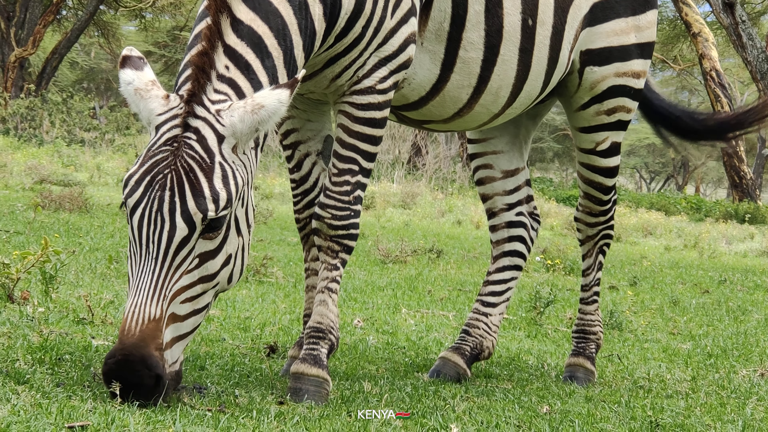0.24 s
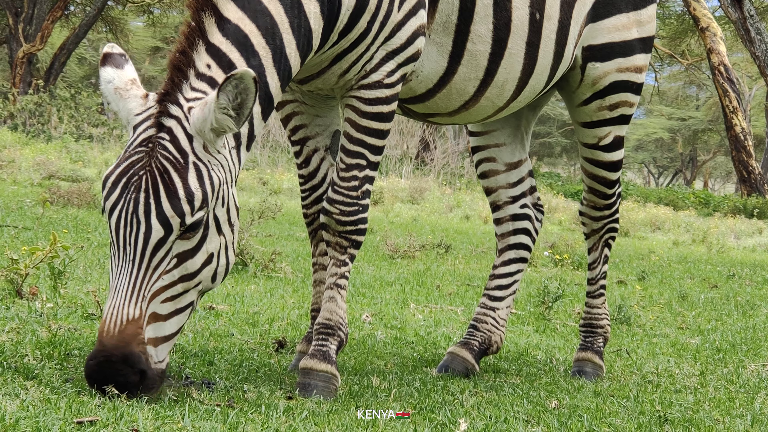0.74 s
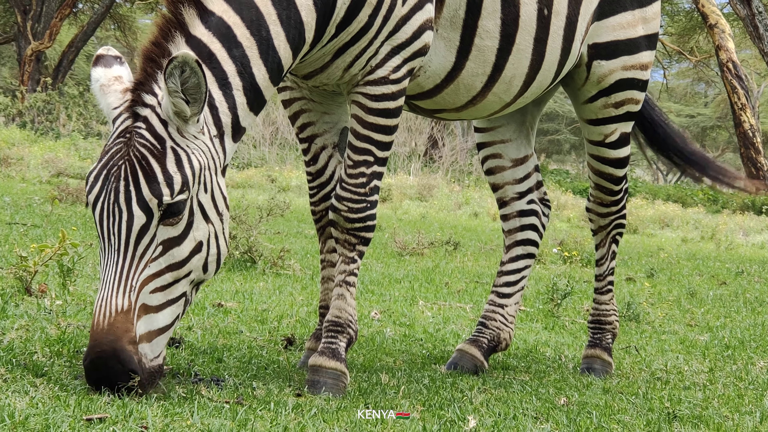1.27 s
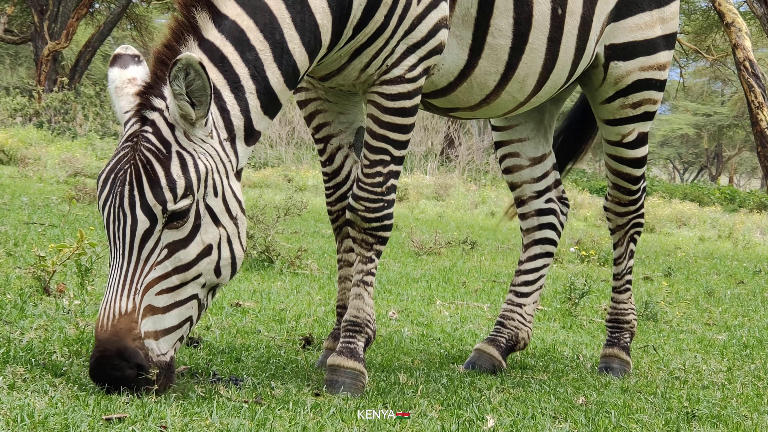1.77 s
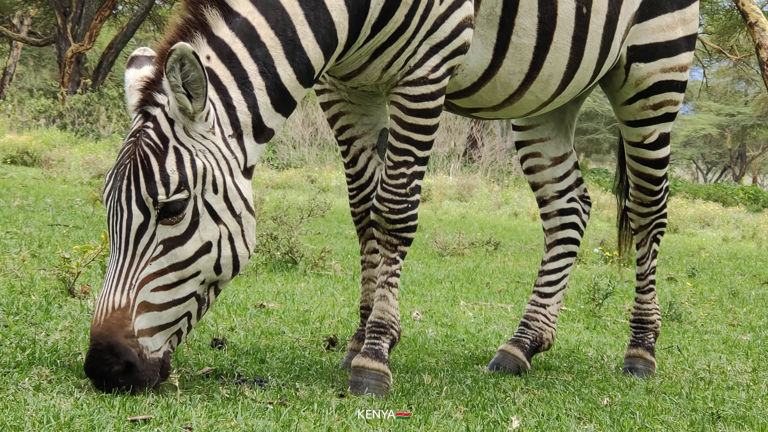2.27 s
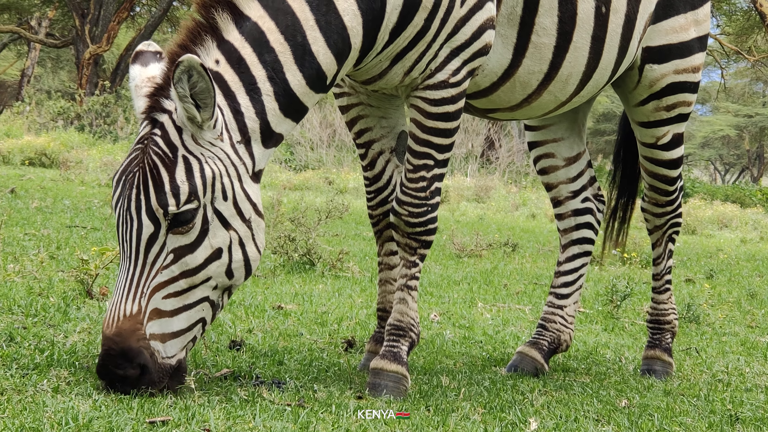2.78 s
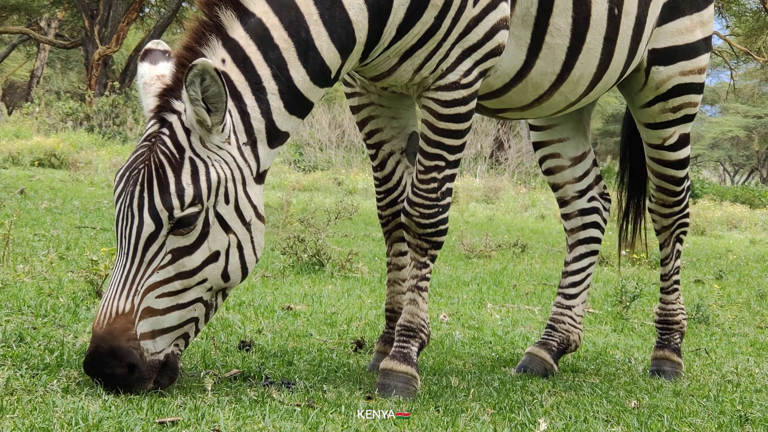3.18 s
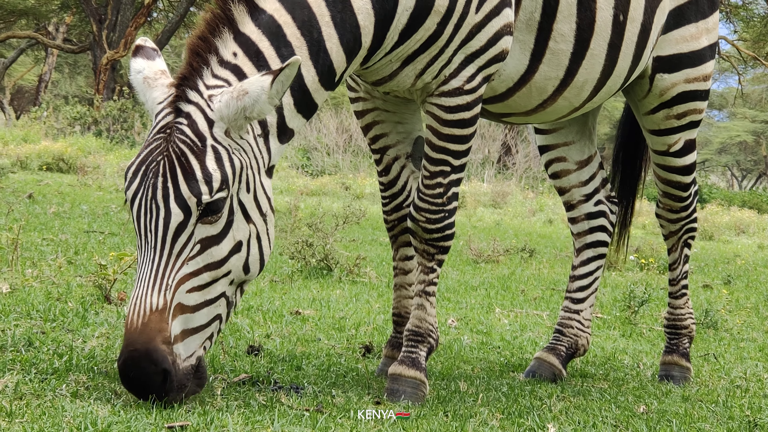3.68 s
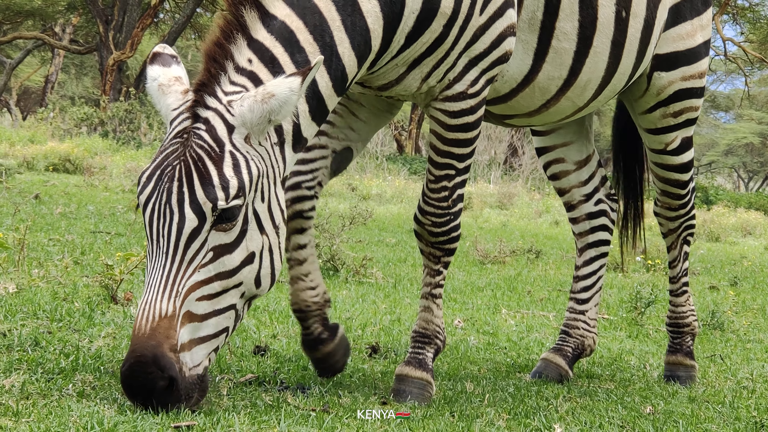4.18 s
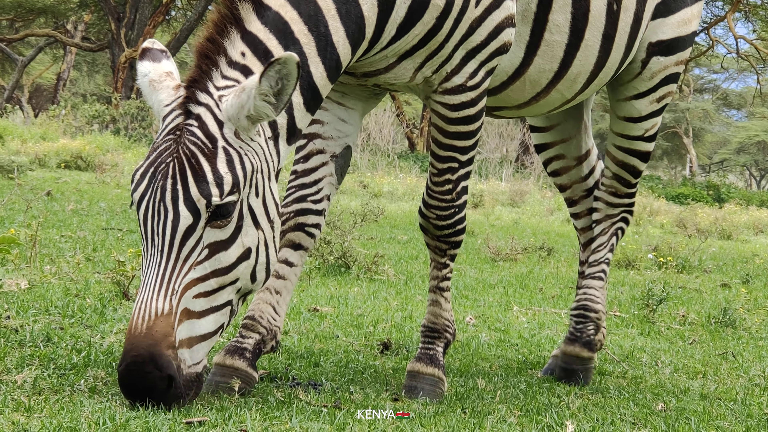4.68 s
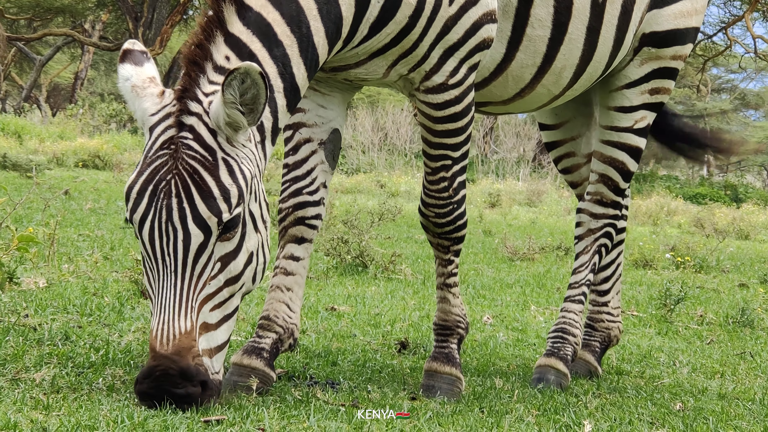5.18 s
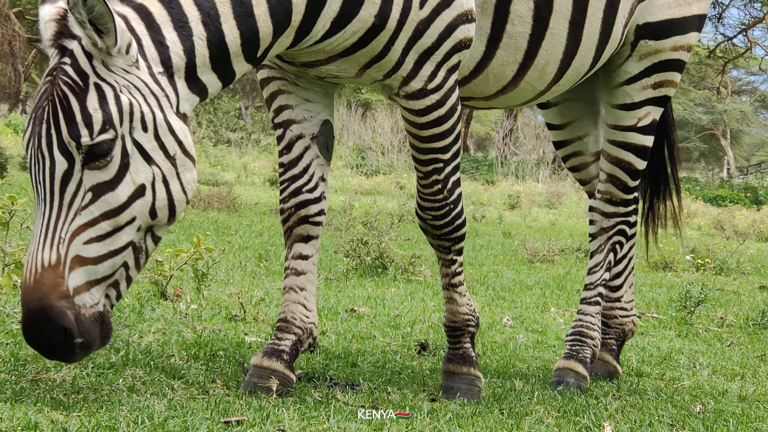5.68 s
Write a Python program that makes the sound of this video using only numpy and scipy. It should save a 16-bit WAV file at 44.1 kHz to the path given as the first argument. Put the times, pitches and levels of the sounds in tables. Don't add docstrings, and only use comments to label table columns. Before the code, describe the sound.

A zebra grazes a few metres from a phone in open grassland. Low wind thuds push mostly on the left in the first second and a half, with a soft coo and quick whistles. Crisp tearing bites with turf thumps come early, near the middle and, loudest, near the end, with small nips and jaw knocks between. A breathy nose blow follows the middle bite, and a shorter puff follows the last.

```python
import sys
import numpy as np
from scipy import signal
from scipy.fft import rfft, irfft, next_fast_len
from scipy.io import wavfile
from scipy.ndimage import uniform_filter1d

SR = 44100
rng = np.random.default_rng(int(sys.argv[2]) if len(sys.argv) > 2 else 0)


def elevation(decibels):
    levels = np.asarray(decibels, float)
    return 10 ** (levels / 20)


def dump(signal):
    limited = np.clip(np.atleast_2d(signal).T, -1, 1)
    pcm = np.round(limited * 32767).astype(np.int16)
    wavfile.write(sys.argv[1], SR, pcm)


N = 261811
T = np.arange(N) / SR


def band(x, hz, width):
    return signal.lfilter(*signal.iirpeak(hz, hz / width, fs=SR), x)


def unit(x):
    return x / np.sqrt(np.mean(x ** 2))


def walk(rate):
    hold = int(SR / rate)
    steps = np.repeat(rng.standard_normal(N // hold + 1), hold)
    return 1.56 * uniform_filter1d(uniform_filter1d(steps, hold), hold)[:N]


def near(s, before, after):
    part = slice(max(int((s - before) * SR), 0), int((s + after) * SR))
    return part, T[part] - s


def placed(x, pan_db, lag_ms, scatter_db, scatter_s):
    t = T[:SR // 3]
    echoes = rng.standard_normal((2, len(t))) * np.exp(-np.log(1000) * t / scatter_s) * (t > .002)
    echoes /= np.sqrt(np.sum(echoes ** 2, axis=1, keepdims=True))
    left = elevation(pan_db / 2) * np.interp(T - lag_ms / 1000, T, x)
    right = elevation(-pan_db / 2) * x
    scatter = signal.fftconvolve(x[None], echoes, axes=1)[:, :N]
    return np.array([left, right]) + elevation(scatter_db) * scatter


def field():
    # f/Hz, level/dB (per Hz)
    colour_points = [(12, -29), (22, -10), (40, -1.5), (65, 0.5), (105, -6), (290, -24.5), (420, -27.5),
                     (1000, -33), (1800, -37), (3200, -39), (5400, -43), (6000, -48.5), (9500, -49),
                     (13500, -47.5), (15300, -51.5)]
    # f/Hz, likeness (0-1)
    likeness = [(60, 0.73), (130, 0.87), (290, 0.42), (640, 0.22), (1400, 0), (3070, 0.06), (6740, 0),
                (14800, 0.04)]
    size = next_fast_len(N)
    octave = np.log2(np.fft.rfftfreq(size, 1 / SR) + 1)
    like_hz, like = np.transpose(likeness)
    like = np.clip(np.interp(octave, np.log2(like_hz), like), 0, .98)
    mid, side = rfft(rng.standard_normal((2, size))) * np.sqrt([1 + like, 1 - like])
    colour_hz, colour_db = np.transpose(colour_points)
    colour = elevation(np.interp(octave, np.log2(colour_hz), colour_db, right=-150))
    ports = colour * np.array([mid + side, mid - side])
    out, swell = 0, walk(0.32)
    for centre in np.arange(4, 14.5, .5):
        share = np.clip(1 - 2 * abs(octave - centre), 0, 1)
        restless_db = np.interp(centre, [5, 9, 13], [1.5, 1.1, .4])
        flicker = elevation(restless_db * (0.61 * swell + walk(9)))
        out = out + flicker * irfft(ports * share, size)[:, :N]
    return elevation(-50.5) * unit(out)


def wind():
    # t/s, peak level/dB, f/Hz, length/s
    gusts_left = [(0.002, -21.5, 36.5, 0.02), (0.057, -23.5, 36.3, 0.047), (0.128, -26, 32.5, 0.077),
                  (0.317, -30, 34.4, 0.055), (0.405, -38, 47.7, 0.03), (0.671, -29.5, 45.4, 0.034),
                  (0.814, -28.5, 46.7, 0.028), (0.949, -36, 39, 0.018), (.98, -39.5, 110, 0.019),
                  (1.035, -26.5, 37.6, 0.051), (1.086, -37.5, 110, .02), (1.122, -29, 85, 0.012),
                  (1.108, -19, 56, 0.03), (1.145, -31, 41, 0.037), (1.224, -27.5, 70, 0.012),
                  (1.243, -23.5, 57.3, 0.022), (1.266, -29.5, 75, 0.011), (1.289, -29, 45, 0.037),
                  (1.601, -34.5, 55, 0.023), (3.735, -40, 60, .05), (3.8, -38, 60, .03)]
    # t/s, peak level/dB, f/Hz, length/s
    gusts_right = [
        (0.476, -39, 34.7, 0.037),
        (2.051, -25.5, 107, 0.01),
    ]
    # t/s, level/dB
    breeze_level = [(0, -51), (.4, -61), (.6, -57), (1.0, -48.5), (1.4, -50), (1.7, -53), (3, -60),
                    (5.94, -50)]
    out = np.zeros((2, N))
    for port, gusts in enumerate([gusts_left, gusts_right]):
        for s, db, hz, length in gusts:
            part, t = near(s, .15, .15)
            push = np.exp(-(t / (0.53 * length)) ** 2)
            out[port, part] -= elevation(db) * push * np.cos(2 * np.pi * hz * t)
    breeze = unit(band(band(rng.standard_normal(N), 35, 49), 35, 60))
    breeze = breeze + elevation(-15) * unit(band(band(rng.standard_normal(N), 120, 90), 120, 90))
    out[0] += breeze * elevation(np.interp(T, *np.transpose(breeze_level)) + 5.3 * walk(12))
    return out


def arched(notes, arch):
    return [(a, b, first, arch * (first + last) / 2, last, db) for a, b, first, last, db in notes]


def whistles(notes, wobble, flutter_db, trill=0., trill_hz=77., lean=0.61, taper=0.64):
    out, waver, flutter = np.zeros(N), 1 + wobble * walk(120), elevation(flutter_db * walk(70))
    for a, b, *hz, db in notes:
        part, t = near(a, 0, b - a)
        beat = 2 * np.pi * trill_hz * t + 1.6
        glide = np.polyval(np.polyfit([0, .5, 1], hz, 2), t / (b - a))
        pitch = glide * (waver[part] - trill * np.sin(beat))
        swell = np.sin(np.pi * np.clip(t / (b - a), 0, 1) ** lean) ** taper
        strokes = 1 + min(12 * trill, 1) * np.cos(beat)
        tone = np.sin(2 * np.pi * np.cumsum(pitch) / SR)
        out[part] += elevation(db + 2.5) * swell * strokes * flutter[part] * tone
    return out


def left_birds():
    # start t/s, end t/s, first f/Hz, last f/Hz, level/dB
    coos = [
        (-0.03, 0.135, 1234, 1170, -58),
        (0.14, 0.2, 1186, 1265, -74),
        (0.5, 0.605, 1150, 1140, -63),
        (.59, .635, 1120, 1030, -72),
        (0.62, 0.66, 1357, 1255, -70),
        (0.96, 1.1, 1103, 1092, -69),
    ]
    # start t/s, end t/s, first f/Hz, last f/Hz, level/dB
    chirps = [(0.12, 0.29, 7700, 6940, -75), (1.08, 1.135, 2600, 2590, -72), (2.74, 2.78, 2100, 2090, -73),
              (3.05, 3.075, 2650, 2700, -67), (3.075, 3.14, 2700, 2760, -69), (4.22, 4.25, 1750, 3300, -75),
              (4.695, 4.745, 3610, 2410, -70), (4.73, 4.81, 2560, 2260, -63), (4.8, 4.83, 2210, 2020, -73),
              (5.005, 5.045, 2900, 2520, -67.5), (5.045, 5.065, 2720, 2700, -75),
              (5.91, 5.94, 5940, 5800, -76)]
    calls = whistles(arched(chirps, 0.96), 0.004, 2.2, lean=0.55, taper=1.05)
    calls = calls + whistles(arched(coos, 1.04), 0.0022, 1.3, lean=0.9, taper=1.3)
    return placed(calls, 5.0, -0.088, -7.0, 0.38)


def right_birds():
    # start t/s, end t/s, first f/Hz, last f/Hz, level/dB
    slurs = [(0.105, 0.14, 5500, 3740, -73), (0.615, 0.628, 5200, 4900, -81),
             (0.623, 0.65, 4300, 3100, -67.5), (.644, 0.66, 2950, 2420, -71), (.587, .61, 3400, 2450, -73),
             (1.665, 1.73, 5660, 3340, -67), (1.73, 1.77, 2900, 2300, -78), (1.94, 2.0, 4200, 3600, -81),
             (1.99, 2.045, 3650, 3250, -75), (2.455, 2.475, 5050, 4700, -74), (2.47, 2.55, 4800, 2840, -79),
             (3.505, 3.555, 5350, 3500, -67.5), (4.052, 4.066, 4500, 4050, -75.5),
             (4.068, 4.084, 3400, 2600, -71), (4.064, 4.078, 3250, 4000, -71),
             (4.27, 4.292, 4300, 4080, -72), (4.193, 4.208, 4200, 3500, -74),
             (5.745, 5.8, 3800, 2550, -71.5), (5.855, 5.885, 4150, 4750, -77),
             (1.575, 1.6, 3700, 5200, -73), (4.315, 4.345, 3800, 3070, -81),
             (0.603, 0.615, 2450, 4230, -76), (0.24, 0.26, 1880, 2840, -73), (1.35, 1.378, 3130, 4100, -68),
             (1.39, 1.408, 2850, 3000, -70), (1.405, 1.418, 3000, 3600, -75)]
    arches = [(0.17, 0.2, 2240, 2640, -74.5), (0.37, 0.385, 2100, 2500, -75), (.553, .592, 3020, 3300, -69),
              (1.416, 1.428, 2370, 2800, -72), (1.378, 1.392, 3920, 3100, -74),
              (1.39, 1.41, 3950, 4300, -79), (1.42, 1.485, 2776, 2040, -67.5),
              (1.59, 1.66, 3220, 2950, -72), (2.24, 2.32, 3070, 3250, -71.5), (2.62, 2.68, 3020, 2420, -75),
              (3.86, 3.91, 3300, 2500, -78), (3.975, 4.012, 2740, 3300, -78),
              (4.012, 4.03, 3320, 2500, -70), (4.23, 4.25, 2870, 3400, -75),
              (4.905, 4.922, 2800, 3180, -73), (4.02, 4.05, 2970, 3050, -77),
              (4.085, 4.105, 4200, 3980, -77), (4.19, 4.225, 1950, 2020, -76),
              (3.93, 3.95, 2100, 2100, -77), (4.78, 4.796, 3950, 4020, -72),
              (4.766, 4.779, 3250, 3320, -72), (4.873, 4.892, 4600, 4350, -80),
              (4.9, 4.93, 4950, 5000, -79), (4.94, 4.95, 3220, 2950, -66)]
    hooks = [
        (4.953, 4.979, 2900, 2850, -68),
        (4.278, 4.303, 2830, 2950, -70),
        (1.312, 1.342, 4150, 2350, -69),
        (1.63, 1.675, 4200, 5420, -71),
        (3.085, 3.118, 3300, 3800, -72),
    ]
    trills = [
        (.335, .465, 4210, 2910, -72.5),
        (.46, .495, 2800, 2200, -72),
        (.485, .545, 2250, 2060, -70),
        (.535, .56, 2300, 3000, -77),
        (4.752, 4.784, 4900, 5100, -74),
        (2.9, 2.98, 3100, 3320, -72),
        (3.575, 3.625, 3150, 3300, -77),
        (4.81, 4.93, 3640, 3970, -79),
    ]
    rolls = [
        (1.13, 1.228, 2400, 2980, -79),
        (1.222, 1.28, 3050, 3700, -73),
        (1.27, 1.322, 3750, 4250, -68),
    ]
    calls = whistles(arched(slurs, 0.98) + arched(arches, 1.055) + arched(hooks, 1.13), 0.006, 3.16)
    calls = calls + whistles(arched(trills, 0.99), 0.024, 3.2, trill=0.055, trill_hz=76.9)
    calls = calls + whistles(arched(rolls, 0.99), 0.016, 2.5, trill=0.045, trill_hz=62.5, lean=1.2, taper=.4)
    return placed(calls, -12.0, 0.426, -4.5, 0.2)


def far_birds(count):
    s, length, hz, glide, db = rng.random((count, 5)).T
    s, hz = s * N / SR * 0.78, 2600 * elevation(5.5 * hz)
    glide = elevation(3.03 * (glide - 0.8))
    end = s + .015 + .03 * length
    notes = np.transpose([s, end, hz / glide, 1.03 * hz, hz * glide, -88 + 7 * db])
    return placed(whistles(notes, 0.018, 2.1), 0.93, 0.35, -1.1, 0.38)


def thumps():
    # t/s, peak level/dB, f/Hz, 60 dB decay/s, rise/ms
    tugs = [(0.8435, -24.5, 135, 0.093, 7.4), (1.782, -37.5, 166, 0.059, 1.7),
            (2.761, -31.5, 280, 0.034, 0.86), (2.772, -43, 428, 0.033, 1.7), (2.784, -24, 80, 0.13, 1.9),
            (2.897, -24, 135, 0.027, 11.4), (2.9136, -18.5, 144, 0.083, 3.5),
            (3.511, -26.5, 150, 0.043, 5.5), (3.549, -42, 160, 0.063, 1.3), (4.86, -48.5, 145, 0.17, 9.9),
            (4.94, -48, 145.3, 0.33, 11), (5.348, -33, 133, 0.054, 13), (5.369, -34.5, 127, 0.12, 4.5),
            (5.3862, -21, 138, 0.092, 1.1), (5.3855, -27, 330, .015, 0.84), (5.389, -39, 700, .04, 1.5),
            (.843, -46, 655, .04, 2), (5.361, -46, 670, .03, 1.5)]
    # t/s, peak level/dB, f/Hz
    knocks = [(0.139, -44.5, 345), (0.161, -46, 314), (.8, -63, 396), (1.075, -53.5, 355),
              (1.306, -44, 340), (1.312, -55, 947), (1.315, -56, 680), (1.3296, -44, 332),
              (1.463, -57, 317), (1.933, -51.5, 1005), (2.225, -57, 392), (2.429, -55, 993),
              (2.4365, -38.5, 319), (4.101, -46, 320), (4.11, -60, 1000), (4.68, -51.5, 347)]
    knock_t60_s, knock_rise_ms = 0.063, 6
    out = np.zeros(N)
    for s, db, hz, t60, rise_ms in tugs + [(*knock, knock_t60_s, knock_rise_ms) for knock in knocks]:
        part, t = near(s, 0.034, .3)
        swell = .5 + .5 * np.tanh((t * 1000 - 1.5) / rise_ms)
        fade = np.exp(-np.log(1000) * np.maximum(t, 0) / t60)
        out[part] -= elevation(db) * swell * fade * np.cos(2 * np.pi * hz * t)
    return placed(out, 0, 0, -19, 0.15)


def cropping():
    # t/s, peak level/dB, pull length/ms
    snaps = [(.8, -48, 0.47), (0.8118, -50, 0.62), (0.8223, -49, 0.88), (0.8238, -43, 0.88),
             (0.8283, -45, 0.5), (0.8314, -46, 0.5), (.83, -49, .5), (0.8368, -46, 0.36), (0.8373, -44, .4),
             (0.8436, -36, 0.61), (2.8874, -37.5, 0.46), (2.8905, -38, 1), (2.892, -36.5, 0.22),
             (2.8958, -34, 0.28), (2.9067, -31.5, 0.42), (2.9073, -39.5, 0.16), (2.913, -29.5, 0.7),
             (5.3603, -36.5, 0.27), (5.3616, -43, 0.23), (5.3636, -44, 0.3), (5.3648, -45, 0.36),
             (5.3688, -46, .25), (5.3702, -43, 0.25), (5.3716, -46, .25), (5.375, -50, 0.51),
             (5.3786, -42, 0.64), (5.3817, -40, 0.84), (5.3863, -26, 0.45), (5.3878, -38, .3),
             (5.4013, -39, 0.55), (5.4147, -50, 0.59),
             (1.934, -49.5, 0.33),
        (1.9374, -46, 1.3),
        (2.2245, -44.5, 0.05),
        (2.9655, -50.5, 0.66),
        (3.4755, -53, 0.49),
        (3.5086, -53, 0.36),
        (3.5113, -41, 0.27),
        (3.5473, -49.5, 0.25),
        (4.54, -59, 0.17),
        (5.4455, -47.5, 0.35),
    ]
    # t/s, peak level/dB, decay/ms
    crackles = [(.8235, -66, 5), (.836, -60.5, 4.7), (.845, -68, 3), (2.8893, -59, 8), (2.906, -64, 3),
                (2.912, -64, 4), (2.922, -61, 2), (2.932, -63, 3), (2.9362, -57.5, 6.4), (2.965, -65, 6),
                (3.51, -68, 4), (5.3593, -55, 3), (5.3688, -55, 5), (5.375, -60, 4), (5.3857, -51.5, 5),
                (5.401, -65, 3.6), (5.4446, -64, 3)]
    # start t/s, end t/s, level/dB
    tears = [
        (0.798, 0.87, -61),
        (1.93, 1.966, -68),
        (2.862, 2.99, -57),
        (3.508, 3.556, -59),
        (4.707, 4.8, -65.5),
        (5.334, 5.44, -48.5),
    ]
    # f/Hz, level/dB, 60 dB decay/s
    muzzle = [(440, -11, 0.029), (660, -14, 0.04), (760, -18, 0.03), (1040, -4.5, 0.055),
              (1245, -0.5, 0.031), (1460, -1.5, 0.018), (1640, -3, 0.026), (2000, -14, 0.016)]
    pull, ticks, splits = np.zeros(N), np.zeros((2, N)), np.zeros(N)
    for s, db, ms in snaps:
        part, t = near(s, .004, .02)
        pull[part] -= elevation(db + 2) * np.exp(-(t / (ms * 7e-4)) ** 2)
        ticks[:, part] += elevation(-61.5 + 0.87 * (db + 40.0)) * (t > -3e-4) * np.exp(-t / 0.00071)
    for s, db, ms in crackles:
        part, t = near(s, 0, .04)
        splits[part] += elevation(db) * np.exp(-t * 1000 / ms)
    effort = np.zeros(N)
    for a, b, db in tears:
        corners = [a, a + 0.23 * (b - a), a + .5 * (b - a), b]
        effort += elevation(db) * np.interp(T, corners, [0, 0.43, 0.7, 0.01])
    chance, size, sign = rng.random((3, N))
    grains = (chance < 1800 / SR) * elevation(-2.5 * np.log(size)) * np.sign(sign - .6)
    pull = pull + 3 * band(grains * effort, 1300, 1100)
    ring = np.zeros(N)
    for hz, db, t60 in muzzle:
        ring += elevation(db + 9.5) * band(pull, hz, np.log(1000) / (np.pi * t60))
    tick_noise = rng.standard_normal((2, N)) * (ticks + elevation(-9.0) * effort)
    split_noise = rng.standard_normal((2, N)) * (splits + elevation(-15.5) * effort)
    fibres = elevation(12) * band(band(split_noise, 5300, 1570), 5300, 1570)
    fibres = fibres + elevation(12.5) * band(band(tick_noise, 2970, 700), 2970, 700)
    muffled = signal.lfilter(*signal.butter(3, 2400, fs=SR), pull + ring)
    return placed(muffled, -0.37, 0.099, -9.5, 0.086) + fibres


def flicks():
    # t/s, peak level/dB
    stalks = [
        (1.925, -68),
        (2.046, -64),
        (2.225, -49),
        (4.54, -62),
        (4.816, -63),
    ]
    out, noise = np.zeros(N), rng.standard_normal(N)
    for s, db in stalks:
        part, t = near(s, 0, .02)
        rustle = noise[part] * np.exp(-t / 0.001)
        click = 1.5 * (t < 1 / SR)
        out[part] += elevation(db) * (rustle + click)
    return placed(band(out, 8300, 22000), 0, 0.37, -12, 0.027)


def resonance(centre, width):
    shake = rng.standard_normal((2, 2, len(centre)))
    shake = signal.lfilter(*signal.butter(2, width / 2, fs=SR), shake)
    turn = 2 * np.pi * np.cumsum(centre) / SR
    return unit(shake[0] * np.cos(turn) + shake[1] * np.sin(turn))


def nostrils():
    # t/s, level/dB, nostril resonance f/Hz
    blows = [
        [(3.02, -78, 1802), (3.12, -66.5, 2030), (3.18, -60.5, 2246), (3.25, -58.5, 2433), (3.3, -57, 2605),
         (3.37, -60.5, 2780), (3.44, -64, 2610), (3.56, -70, 2520), (3.75, -83, 2510)],
        [(5.42, -77, 2750), (5.49, -62.5, 2600), (5.52, -53, 2530), (5.56, -57, 2469), (5.6, -62.5, 2387),
         (5.65, -63.5, 2518), (5.78, -72.5, 2464), (5.86, -72.5, 2450), (5.94, -79, 2460)],
    ]
    # f/Hz, width/Hz, level/dB
    noses = [
        [(2560, 160, -4), (3130, 400, -4), (3800, 300, -3.5), (4500, 900, -5.5), (5400, 900, -9),
         (7750, 700, -10.5)],
        [(2520, 85, -3), (3050, 500, -5), (3850, 300, -6), (4400, 600, -10), (5070, 190, -6), (2150, 360, -12)],
    ]
    nostril_widths = [330, 200]
    # level/dB at 2500 Hz and -58.5 dB, slope/dB per kHz, slope/dB per dB of level
    jets = [(-3.5, 15.5, 0.3), (-8, 7, -0.2)]
    out = np.zeros((2, N))
    for rows, nose, nostril_width, (jet_db, per_khz, per_db) in zip(blows, noses, nostril_widths, jets):
        s, db, hz = np.transpose(rows)
        part, t = near(s[0], 0, s[-1] - s[0])
        db, hz = np.interp(T[part], s, db), np.interp(T[part], s, hz)
        bright = jet_db + per_khz * (hz - 2500) / 1000 + per_db * (db + 58.5)
        (passage_hz, passage_width, passage_db), *upper = nose
        air = resonance(hz, nostril_width)
        air = air + elevation(passage_db) * resonance(passage_hz + 0 * hz, passage_width)
        for f, width, gain_db in upper:
            centre = f * (hz / 2600) ** 0.25
            air = air + elevation(gain_db + bright * f / 4000) * resonance(centre, width)
        out[:, part] = elevation(db + 1.1 * walk(60)[part]) * air
    return out


def scene():
    air = field() + wind()
    trees = left_birds() + right_birds() + far_birds(count=70)
    zebra = thumps() + cropping() + flicks() + nostrils()
    return air + trees + zebra


def low_pass(x):
    return signal.sosfilt(signal.butter(12, 15480, fs=SR, output="sos"), x)


def record(dry):
    hz, _, cells = signal.stft(dry, SR, nperseg=1024)
    chance = rng.standard_normal(cells.shape[1:])
    patches = unit(uniform_filter1d(uniform_filter1d(chance, size=3, axis=0), size=7, axis=1))
    depth_db = np.interp(hz, [2500, 6000], [2.2, 9.5])[:, None]
    level = abs(cells).mean(axis=0)
    level = uniform_filter1d(uniform_filter1d(level, size=3, axis=0), size=3, axis=1)
    usual = np.median(level, axis=1, keepdims=True)
    depth_db = depth_db * np.clip(1.6 - .5 * level / usual, .2, 1)
    cells = cells * elevation(depth_db * np.minimum(patches + 0.06, 0.37 * patches))
    thinned = signal.istft(cells, SR, nperseg=1024)[1][:, :N]
    return low_pass(thinned)


dry = scene()
out = record(dry)
dump(out)
```